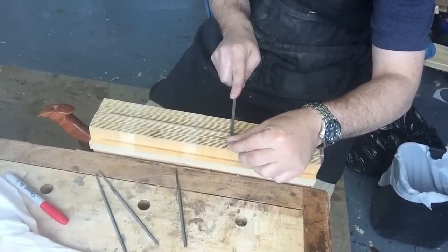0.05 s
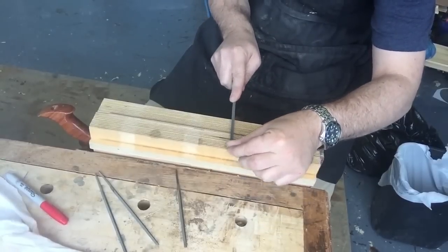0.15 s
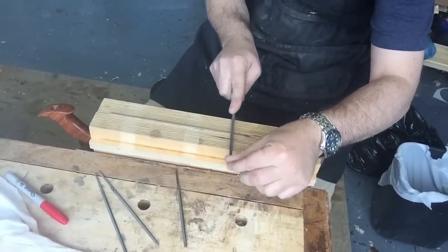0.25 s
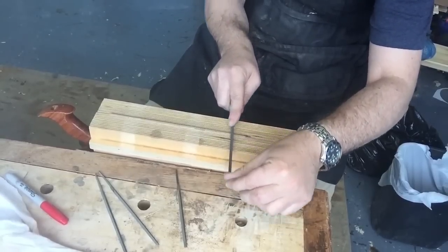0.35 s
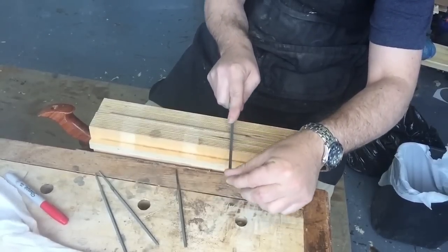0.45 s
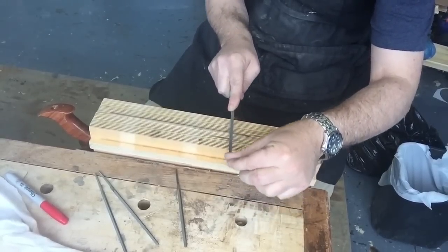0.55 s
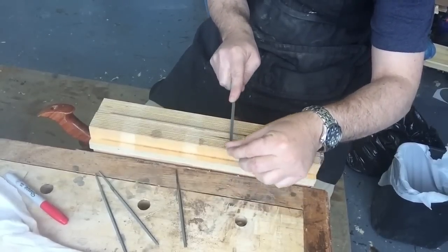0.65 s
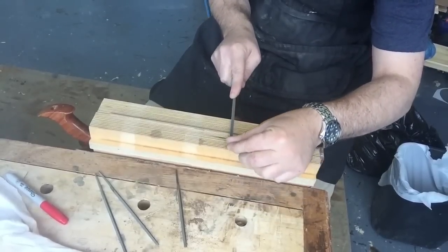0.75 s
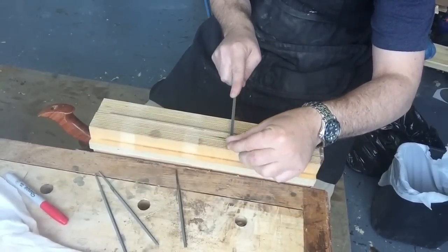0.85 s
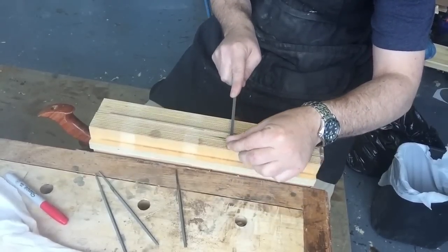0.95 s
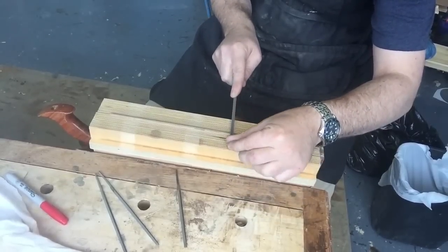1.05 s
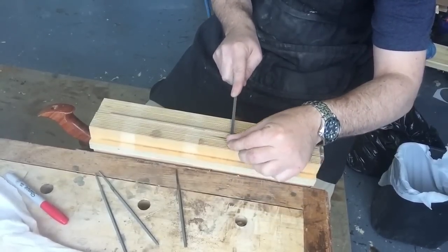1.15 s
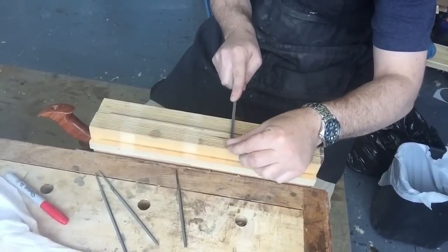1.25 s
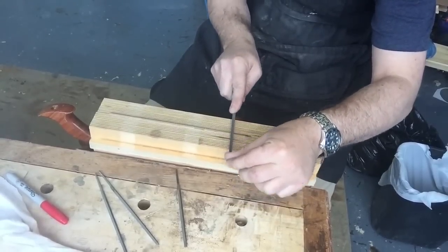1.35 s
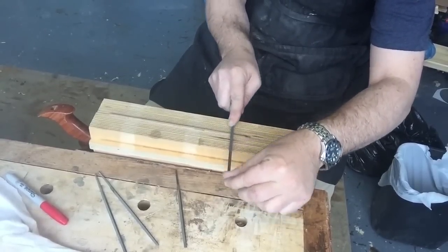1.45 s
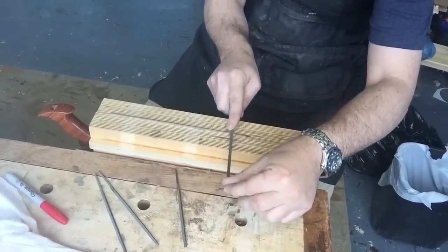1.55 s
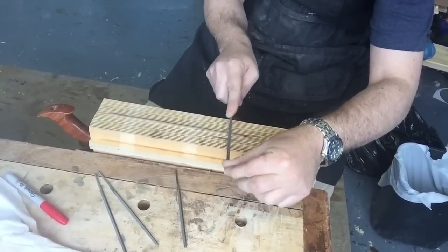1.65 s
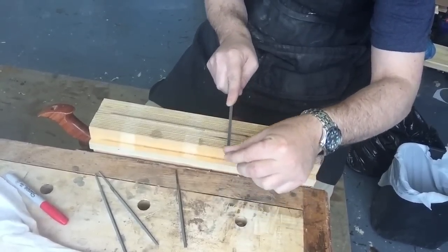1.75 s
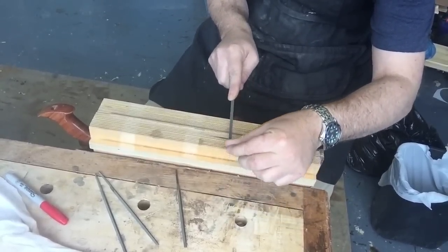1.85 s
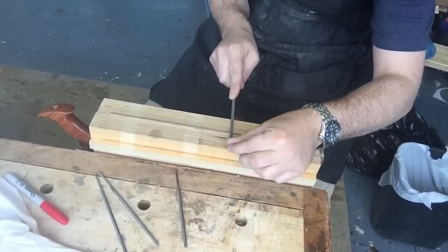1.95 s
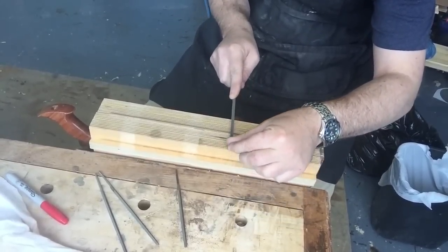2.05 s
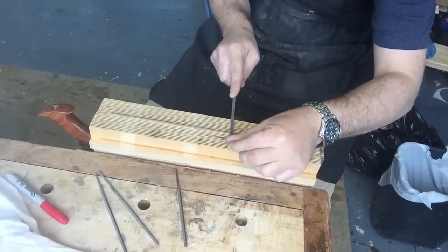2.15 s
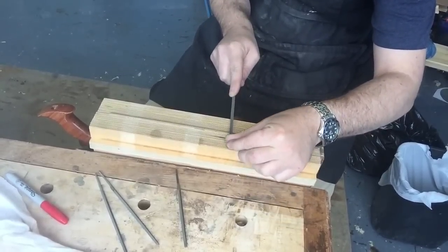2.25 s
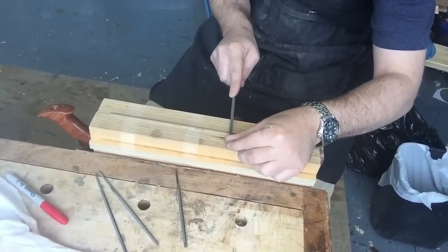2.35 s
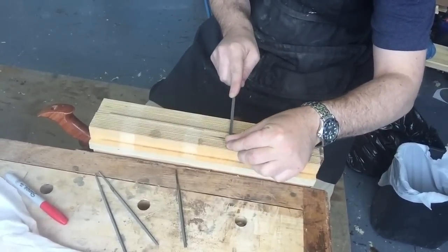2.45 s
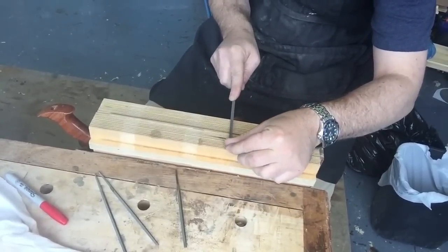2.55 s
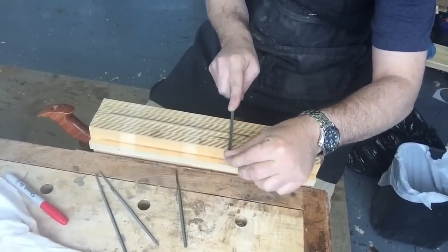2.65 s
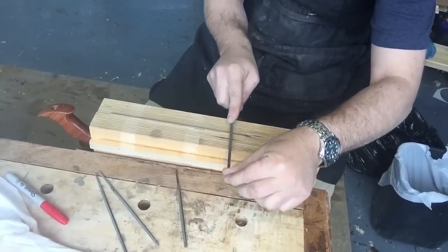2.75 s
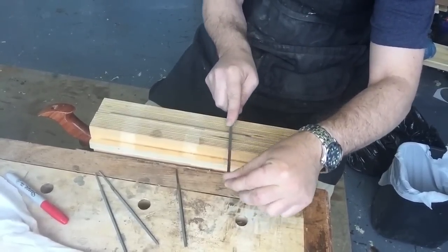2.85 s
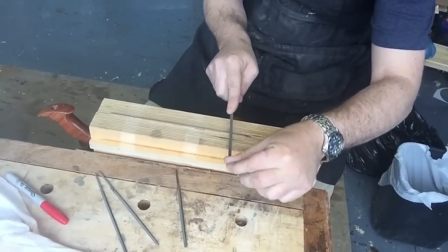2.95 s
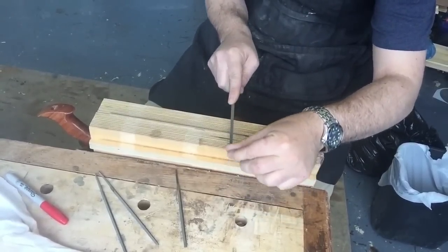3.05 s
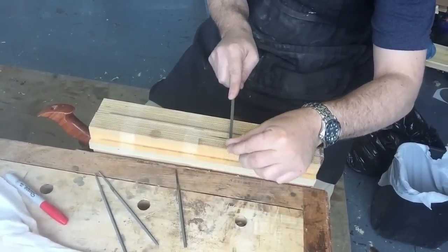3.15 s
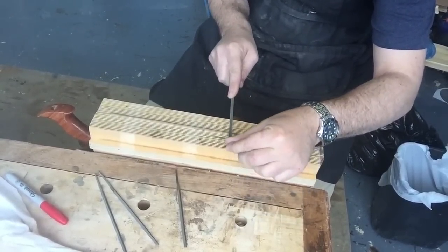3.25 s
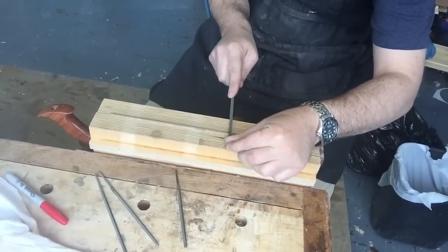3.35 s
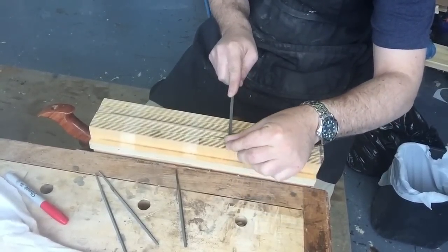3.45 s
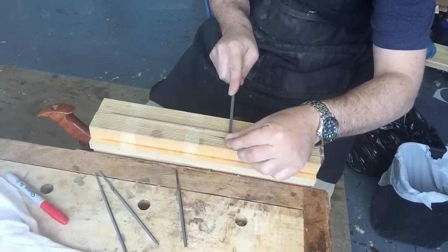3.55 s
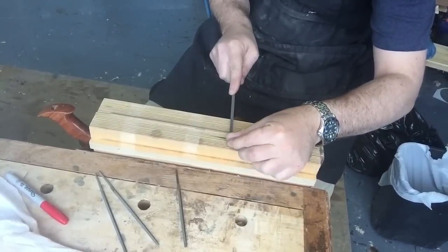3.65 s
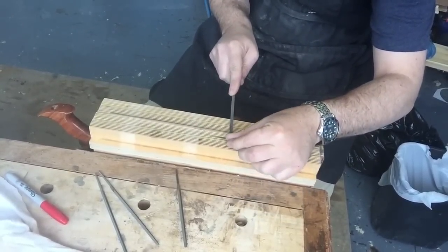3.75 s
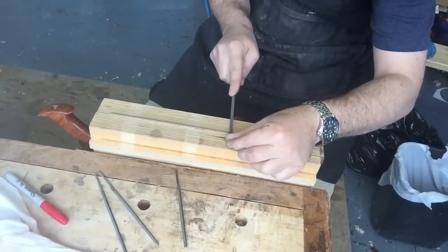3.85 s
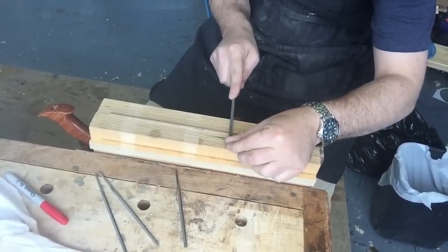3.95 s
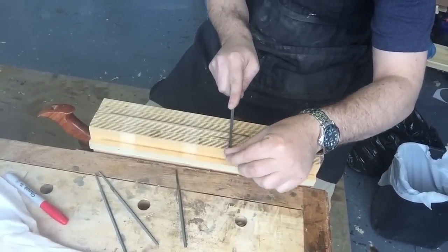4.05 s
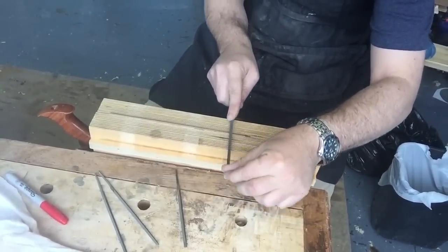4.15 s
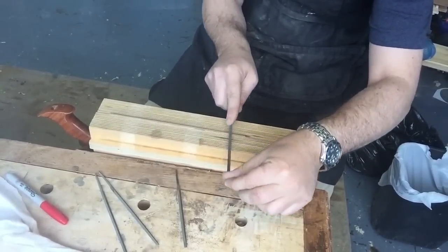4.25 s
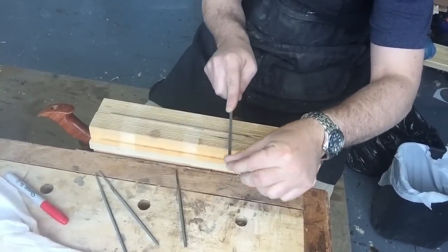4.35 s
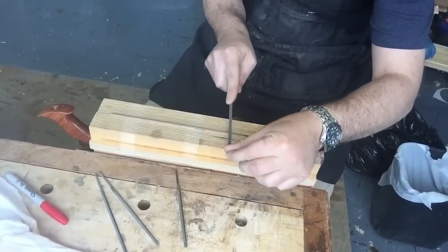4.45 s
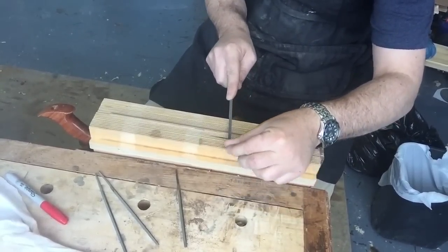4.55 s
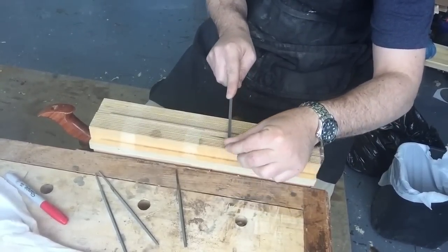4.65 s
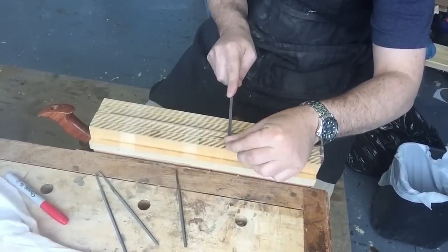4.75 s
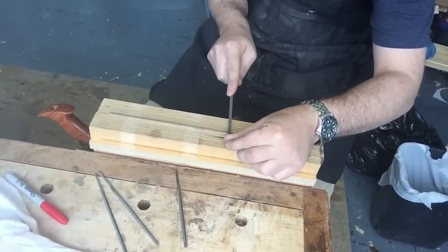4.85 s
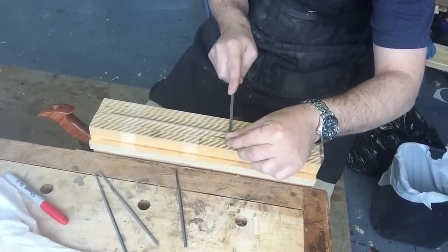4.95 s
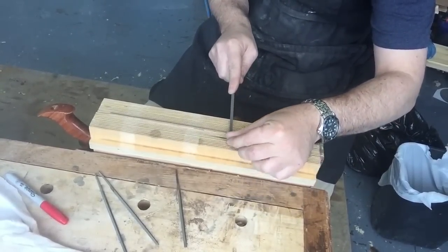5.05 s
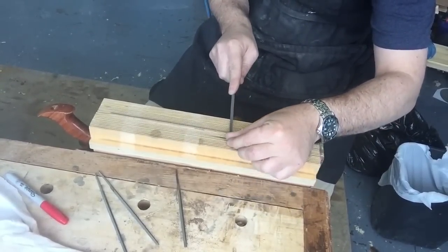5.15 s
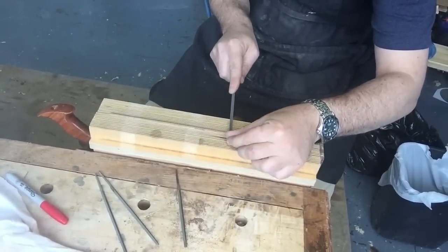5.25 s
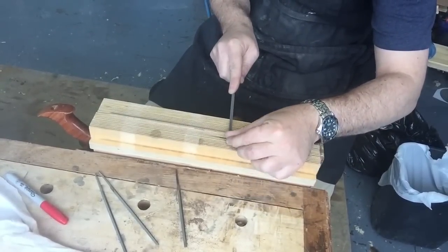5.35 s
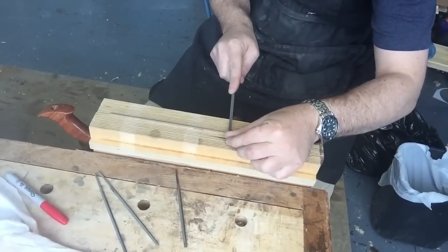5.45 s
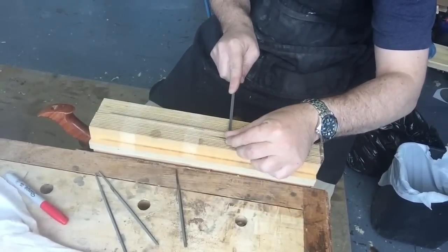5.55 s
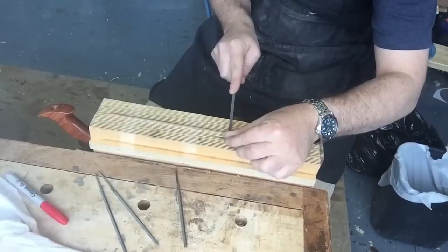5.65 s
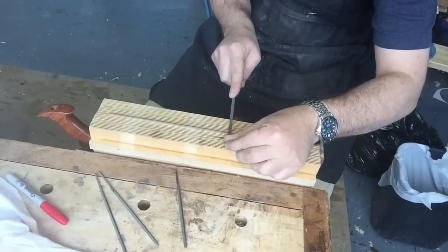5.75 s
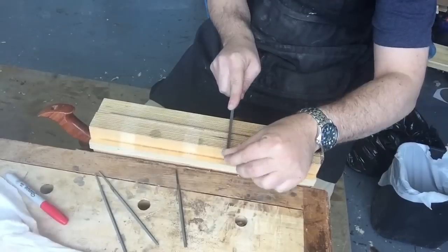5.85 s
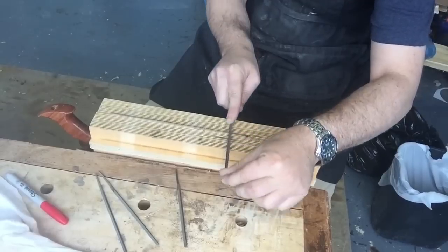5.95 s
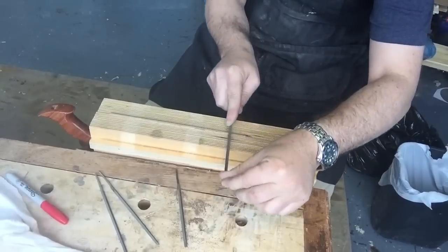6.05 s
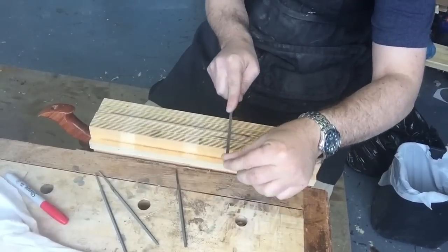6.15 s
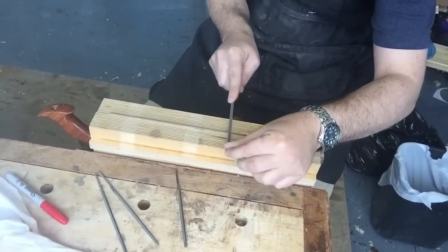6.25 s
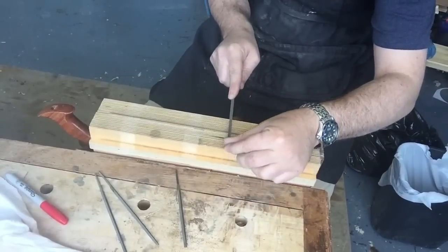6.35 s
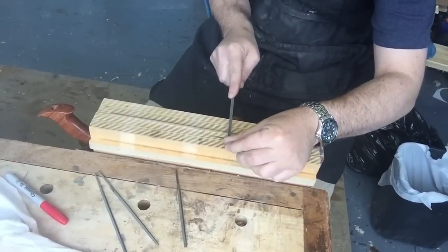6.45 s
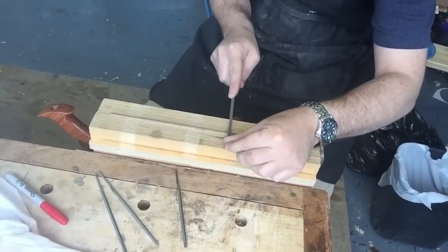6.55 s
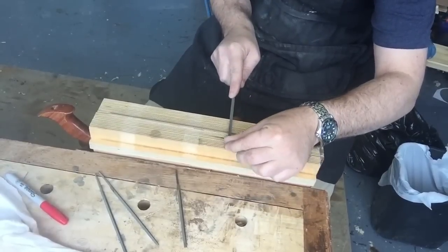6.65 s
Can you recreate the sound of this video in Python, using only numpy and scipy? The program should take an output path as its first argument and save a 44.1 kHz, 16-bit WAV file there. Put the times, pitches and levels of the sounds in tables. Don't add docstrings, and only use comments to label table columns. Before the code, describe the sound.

Five short, harsh rasping strokes of a metal file on saw teeth, each with a thin high squeal, separated by quiet scuffs and knocks in a small workshop.

```python
import sys
import numpy as np
from scipy import signal
from scipy.fft import rfft, irfft, next_fast_len
from scipy.io import wavfile
from scipy.ndimage import uniform_filter1d, map_coordinates

SR = 44100
rng = np.random.default_rng(int(sys.argv[2]) if len(sys.argv) > 2 else 0)


def output_pcm(signal):
    pcm = np.clip(np.atleast_2d(signal).T, -1, 1) * 32767
    wavfile.write(sys.argv[1], SR, np.round(pcm).astype(np.int16))


def rack_gain(trim_db):
    fader = np.asarray(trim_db, float)
    return 10 ** (fader / 20)


N = 295911


def unit(x):
    return x / np.sqrt(np.mean(x ** 2) + 1e-20)


def along(points, hz):
    f, v = np.transpose(points)
    return np.interp(np.log(hz + 1), np.log(f + 1), v)


def wobble(rate):
    coarse = np.arange(0, N + 16, 16)
    knots = rng.standard_normal(int(N * rate / SR) + 4)
    curve = map_coordinates(knots, [coarse * rate / SR])
    return np.interp(np.arange(N), coarse, curve)


def colour(spectrum):
    m = next_fast_len(N + 8192)
    gain = rack_gain(along(spectrum, np.fft.rfftfreq(m, 1 / SR)))
    return unit(irfft(rfft(rng.standard_normal(m)) * gain, m)[:N])


def ring(modes, low_hz, high_hz):
    hz, width_hz, level_db = np.transpose(modes)[:, :, None]
    t = np.arange(SR // 10) / SR
    decay = np.exp(-np.pi * width_hz * t)
    h = rack_gain(level_db) * width_hz * decay * np.sin(2 * np.pi * hz * t)
    edges = signal.butter(4, [low_hz, min(high_hz, SR / 2.1)], "band", fs=SR, output="sos")
    h = signal.sosfilt(edges, h)
    return h / np.linalg.norm(h.sum(0))


def burst(response, seconds):
    t = np.arange(SR // 20) / SR
    contact = rack_gain(-60 * t / seconds) * rng.standard_normal(len(t))
    struck = signal.fftconvolve(response, contact)[:len(response)]
    return struck / abs(struck).max()


def slips(rate, seconds):
    jumps = (rng.random(N) < rate / SR) * rng.random(N)
    return unit(signal.lfilter([1], [1, -np.exp(-1 / (seconds * SR))], jumps))


def ridges(rate, jitter, spread_db, smooth):
    count = np.floor(np.cumsum(rate) / SR + jitter * wobble(500))
    struck = np.diff(count, prepend=0) > 0
    size = rack_gain(spread_db * np.clip(rng.standard_normal(N), -3, 1.8)) * np.sqrt(SR / rate)
    share = np.clip(smooth, 0, 1)
    return np.sqrt(1 - share) * unit(struck * size) + np.sqrt(share) * rng.standard_normal(N)


# time_s, level_db
RUMBLE_LEVEL = [(0.0, -58.5), (0.3, -56.5), (0.9, -59), (1.12, -60.5), (1.36, -58), (1.49, -50.5),
                (1.75, -61.5), (2.35, -62), (2.78, -58.5), (3.87, -62), (4.2, -52.5), (4.48, -58.5),
                (4.8, -62.5), (4.95, -50.5), (5.19, -62), (5.96, -56.5), (6.32, -60), (6.71, -62)]
# frequency_hz, density_db (per Hz)
RUMBLE = [(20, -36.5), (48, -9), (62, 0), (100, -4), (185, -9.5), (212, 0), (270, -11.5), (480, -19)]
# frequency_hz, density_db (per Hz)
HISS = [(290, -25), (500, -5.5), (676, -5), (747, -3.5), (1360, -7.5), (2040, -15), (3620, -18),
        (15400, -28)]


def air():
    s, db = np.transpose(RUMBLE_LEVEL)
    swell_db = np.interp(np.arange(N) / SR, s, db) + 1.1 * wobble(7.6) + 2.3 * wobble(3.99)
    rumble = colour(RUMBLE + [(560, -120)])
    return rack_gain(swell_db) * rumble + rack_gain(-69.5) * colour(HISS)


# start_s, length_s, level_db, bench_above_db, steel_above_db
DRAGS = [(0.0, 0.077, -69, 13, -16), (1.133, 0.043, -59, -5, -21.5), (1.19, 0.029, -55, -10, -8.5),
         (2.078, 0.054, -61.5, 2.5, -16), (2.568, 0.1, -61, -6.5, -13), (3.433, 0.042, -74, 6, -10.5),
         (3.467, .04, -72.5, -5, -24), (3.56, 0.088, -65, 11, -16), (4.782, 0.0635, -55.5, 10, -16.5),
         (4.864, 0.2, -55.5, 2, -17.5), (5.443, 0.057, -71.5, 12, -13), (5.555, 0.044, -68, 1, -14)]


def scuff():
    touch_s, leave_s, tooth_db = 0.01, 0.017, -7
    t, gains = np.arange(N) / SR, np.zeros((4, N))
    for s, length, db, bench_db, steel_db in DRAGS:
        touch = np.clip(np.minimum((t - s) / touch_s, (s + length - t) / leave_s), 0, 1) ** 2
        gains += touch * rack_gain(db + np.array([[0], [bench_db], [steel_db], [steel_db + tooth_db]]))
    return gains


# frequency_hz, width_hz, level_db
LOOSE_JAWS = [(764, 39, -2.5), (974, 43, 7), (1520, 47, -6), (1750, 37, -12), (2260, 130, -12),
              (2923, 19, -32.5)]
# frequency_hz, width_hz, level_db
VISE = [(595, 48, -4), (817.5, 21, -31), (840, 17, -15.5), (922, 24, 6), (1063, 16, 3.5), (1112, 99, 2),
        (1249, 160, 5.5), (1520, 170, -2.5), (1750, 67, -16), (1946, 220, 0), (2325, 300, -3.5),
        (2542, 300, -9.5), (2853, 120, 2), (2910, 40, -1)]
# frequency_hz, width_hz, level_db
BENCH = [(166, 13, -10.5), (199, 7.3, -5), (261.7, 11.5, 6), (311, 66, -5), (439.4, 31.43, 1),
         (430, 15, -21)]
# frequency_hz, width_hz, level_db
EDGE = [(3900, 300, 4.5), (4500, 600, 2), (6000, 700, -2.5), (6790, 550, -4), (9300, 690, -11)]
# frequency_hz, width_hz, level_db
TOOTH = [(13000, 100, -10), (13290, 520, 2.5), (13400, 400, -5), (14600, 410, -8), (15150, 450, -8)]


def drags():
    grab = np.clip(slips(90, seconds=.004), 0, 2.2)
    flutter = unit(rack_gain(1.5 * wobble(70) + 1.5 * grab))
    rate = np.full(N, 460)
    force = ridges(rate, jitter=0.26, spread_db=3.5, smooth=0.5) * flutter
    bodies = [ring(LOOSE_JAWS + VISE[5:], 500, 3300), ring(BENCH, 130, 600),
              ring(EDGE, 3400, 11000), ring(TOOTH[:3], 11800, 15000)]
    responses = [body.sum(0) for body in bodies]
    return signal.oaconvolve(scuff() * force, responses, axes=1)[:, :N].sum(0)


# frequency_hz, level_db
ECHO = [(260, -7.5), (950, 0), (2000, -1.5), (2900, -8), (3300, 1), (3750, -1), (4400, 0), (15000, -5)]
# frequency_hz, t60_s
ROOM = [(150, 0.67), (700, 0.34), (1050, 0.39), (1500, 0.32), (3000, 0.43), (4000, 0.41), (9000, 0.22),
        (14000, 0.19)]


def workshop(x):
    hz, t, z = signal.stft(rng.standard_normal((4, SR * 3 // 4)), SR, nperseg=256)
    decay_db = along(ECHO, hz)[:, None] - 60 * t / along(ROOM, hz)[:, None]
    tails = signal.istft(z * rack_gain(decay_db), SR, nperseg=256)[1]
    turn = np.arange(N) / SR * 9 + np.arange(4)[:, None] * np.pi / 4
    delayed = np.pad(x, (300, 0))[:N]
    parts = delayed * np.clip(np.cos(2 * turn), 0, 1)
    return signal.fftconvolve(parts, tails / np.linalg.norm(tails[0]), axes=1)[:, :N].sum(0)


# start_s, peak_db, note_hz, note_above_db, edge_above_db
KNOCKS = [(0.163, -61.5, 1980, 7, -10.5), (2.091, -48, 1440, -20, -11), (2.24, -56, 1508, -12, -19.5),
          (2.401, -38.5, 2400, -4, -4), (2.419, -60, 2264, 11, -44), (3.487, -58, 960, 10, -31),
          (3.595, -49.5, 2302, -3, -27.5), (3.804, -42, 1473, -16, -8.5), (3.995, -51, 10700, 9, -6),
          (4.799, -41, 1780, -9.5, -28), (5.201, -50.5, 1750, -7.5, -28), (5.331, -56, 3900, 1, -8.5),
          (5.443, -51.5, 1540, -12, -13), (5.467, -47.5, 1920, -22, -14)]


def knocks():
    out = np.zeros(N + SR)
    jaws, edge = ring(LOOSE_JAWS, 600, 3300), ring(EDGE[1:4], 3600, 7900).sum(0)
    for s, db, hz, note_db, edge_db in KNOCKS:
        strengths = rack_gain(rng.normal(0, 2.6, len(jaws)))
        wood = burst(strengths @ jaws, seconds=0.064)
        note = burst(ring([(hz, .2 * min(hz, 3000), 0)], 400, 14000)[0], seconds=0.039)
        steel = burst(edge, seconds=0.016)
        knock = wood + rack_gain(note_db + 3.0) * note + rack_gain(edge_db) * steel
        out[round(s * SR):][:len(edge)] += rack_gain(db - 4.5) * knock
    return out[:N]


# time_s, bite_db
STROKES = [
    [(0.212, -49), (0.226, -30), (0.246, -32), (0.296, -27), (0.386, -22.5), (0.392, -23), (0.49, -37.5)],
    [(1.295, -69), (1.301, -49.5), (1.363, -26.5), (1.373, -29.5), (1.415, -23), (1.581, -26.5),
     (1.62, -46)],
    [(2.575, -86.5), (2.623, -40), (2.659, -31.5), (2.735, -24.5), (2.849, -26), (2.907, -34), (2.92, -58)],
    [(3.98, -58.5), (4.044, -41.5), (4.064, -32.5), (4.084, -27.5), (4.204, -25), (4.3, -33), (4.33, -62)],
    [(5.806, -40), (5.86, -29), (5.932, -22.5), (6.046, -25), (6.052, -30.5), (6.084, -30.5), (6.105, -48)],
]
# bench_weight_db, bench_weight_gained_db, tooth_freedom_db
GRIP = [
    (-0.3, -2.5, 5),
    (-0.1, 1.1, -1.5),
    (2, -2.1, -2.5),
    (-1.5, 3, -1.5),
    (2, -9.5, 0),
]
# full_bite_above_db, growth_db_per_db, gained_tip_to_handle_db
FOLLOW = [
    (-2.5, 1, -0.5),
    (-10, 0.43, 2),
    (-16, 1.04, 4.5),
    (-8, 1.7, 0.5),
]


def pressure():
    full_bite_db = -26
    slow, fast, fastest_at = 190, 950, .62
    t, gains, rate = np.arange(N) / SR, np.zeros((4, N)), np.full(N, float(slow))
    above_db, grows, gained_db = np.transpose(FOLLOW)[:, :, None]
    for rows, (weight_db, lean_db, keen_db) in zip(STROKES, GRIP):
        s, bite_db = np.transpose(rows)
        done = np.clip((t - s[0]) / (s[-1] - s[0]), 0, 1)
        lift = np.clip((s[-1] - t) / 0.0041, 0, 1) * (t >= s[0])
        excess_db = np.interp(t, s, bite_db) - full_bite_db
        grip_db = np.array([0 * t, weight_db + lean_db * done, 0 * t, keen_db + 0 * t])
        gains += lift * rack_gain(full_bite_db + above_db + grows * excess_db + gained_db * done + grip_db)
        rate += (fast - slow) * (lift > 0) * np.exp(-((done - fastest_at) / .36) ** 2)
    return gains, rate


# start_s, peak_db, bench_above_db, steel_above_db
TICKS = [(0.204, -24, -4, -7.5), (0.216, -26, -5.5, -12.5), (0.227, -24, 4, -1), (0.249, -43, -13, -15.5),
         (1.162, -57, -7, 5), (1.18, -60, -2, 4), (1.2, -41, -22, -6), (1.305, -45, 9, 3),
         (1.321, -36, -1, -7), (1.332, -17.5, -2, -10), (1.348, -39, -19, -20), (1.358, -23, -15, -12),
         (2.587, -58, -3.5, -14), (2.61, -35.5, -32.5, -6), (2.617, -30, -16, -15), (2.641, -32, -18, -11),
         (2.663, -23.5, -9.5, -12.5), (3.993, -39, 2.5, -17), (4.024, -26.5, -21, -6),
         (4.031, -28, 10, -14), (4.072, -33, -45, -20), (4.086, -30, -41, -11.5), (4.926, -46, 7.5, -4),
         (4.966, -46, -5, -5), (5.005, -54, 5, -6), (5.066, -40.5, -2.5, -15.5),
         (5.783, -32.5, -0.5, -11.5), (5.793, -36.5, -11.5, -9.5), (5.809, -21, 3.5, -11),
         (5.86, -17.5, -30, -17), (6.037, -24.5, -20, -1.5)]
# frequency_hz, width_hz, level_db
BLADE = [(3750, 110, 7), (4100, 170, 1), (4654, 930, -1), (5620, 350, -5), (6400, 1300, -0.5),
         (7320, 580, -1.5), (8840, 590, -1), (9600, 550, 2), (11060, 920, -3.5), (11900, 400, 0.5)]


def filing():
    gains, rate = pressure()
    force = ridges(rate, jitter=.1, spread_db=2.74, smooth=0.6)
    bodies = [ring(VISE, 480, 3200), ring(BENCH, 140, 600), ring(BLADE, 3250, 12500), ring(TOOTH, 11800, 17000)]
    chatter = np.clip(slips(140, seconds=0.0012), 0, 2.1)
    depths_db = [(.9, 1.6), (.9, .6), (1.4, 3.6), (2.6, 3.8)]
    flutter = [rack_gain(wobble_db * wobble(45) + skip_db * chatter) for wobble_db, skip_db in depths_db]
    out = np.zeros(N + SR)
    for gain, body, bite, rock_db in zip(gains, bodies, flutter, (2.5, 2.9, 2.5, 3)):
        shares = np.array([unit(rack_gain(rock_db * wobble(30))) for mode in body])
        drive = gain * unit(bite) * force * shares
        out[:N] += signal.oaconvolve(drive, body, axes=1)[:, :N].sum(0)
    for s, db, bench_db, steel_db in TICKS:
        for body, above_db in zip(bodies, [-2.5, bench_db - 8, steel_db - 2, steel_db + 1.5]):
            strengths = rack_gain(rng.normal(0, 2.63, len(body)))
            catch = strengths[:-1] @ body[:-1]
            out[round(s * SR):][:len(catch)] += rack_gain(db + above_db - 4.0) * burst(catch, seconds=.011)
    return out[:N]


# centre_s, level_db, pitch_hz
SQUEALS = [(0.319, -23.5, 12900), (0.327, -23.5, 12200), (0.367, -33, 14600), (0.387, -18.5, 13230),
           (0.424, -34, 14800), (0.451, -30.5, 13600), (1.408, -34, 13400), (1.429, -27, 13200),
           (1.429, -32, 12700), (1.553, -29.5, 14600), (1.57, -26, 13520), (1.579, -45, 12500),
           (2.744, -33, 13600), (2.807, -41.5, 13900), (2.86, -30, 13600), (2.878, -28.5, 14150),
           (4.133, -29, 13400), (4.161, -26, 14200), (4.22, -39, 14300), (5.866, -37, 13500),
           (5.95, -25, 13600), (5.96, -26, 12600), (5.994, -30.5, 15100), (6.013, -20.5, 13460),
           (6.017, -38.5, 12700), (6.066, -27.5, 14100)]


def squeals():
    out, t = np.zeros(N), np.arange(-SR // 20, SR // 20) / SR
    for s, db, hz in SQUEALS:
        shake = uniform_filter1d(rng.standard_normal((2, len(t))), 60, axis=1)
        pitch_hz = hz - 7000 * t + 1500 * shake[0]
        phase = 2 * np.pi * np.cumsum(pitch_hz) / SR
        swell = np.exp(-(t / 0.012) ** 4) * unit(rack_gain(np.clip(45 * shake[1], -14, 5)))
        out[round(s * SR) - SR // 20:][:len(t)] += rack_gain(db + 2.0) * swell * np.sin(phase)
    return out


def scene():
    near, taps = filing() + squeals() + drags(), knocks()
    direct = rack_gain(1.5) * (near + taps)
    answer = rack_gain(-6) * workshop(near + rack_gain(-3) * taps)
    return (direct + answer + air())[None]


def top_cut(x):
    return signal.sosfilt(signal.butter(12, 15700, fs=SR, output="sos"), x)


def record(dry):
    top_hz, ceiling = 15330, .43
    hz = np.fft.rfftfreq(N, 1 / SR)
    limited = irfft(rfft(dry) * rack_gain(-np.clip(hz - top_hz, 0, 600) / 5), N)
    limited = limited / (1 + abs(limited / ceiling) ** 4) ** .25
    return top_cut(limited)


dry = scene()
out = record(dry)
output_pcm(out)
```